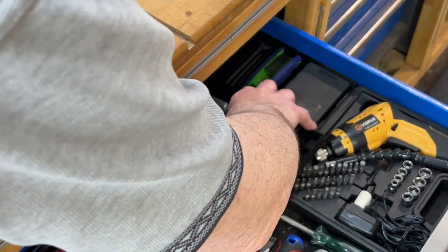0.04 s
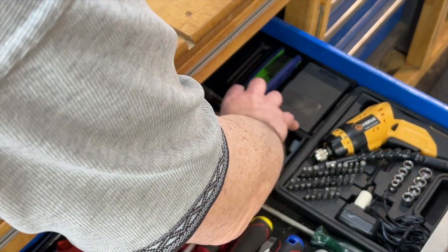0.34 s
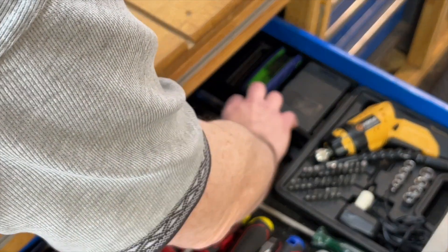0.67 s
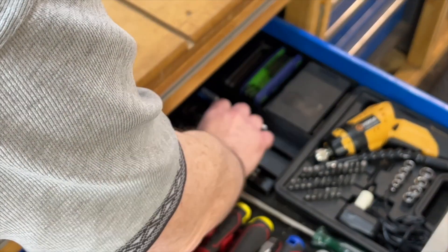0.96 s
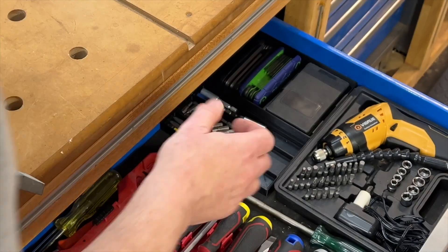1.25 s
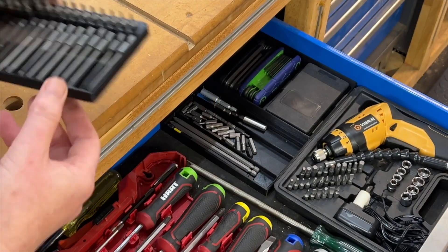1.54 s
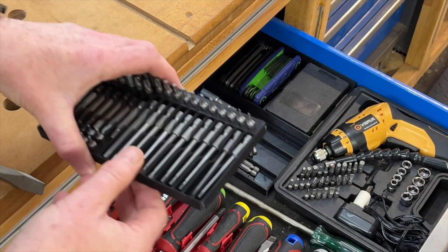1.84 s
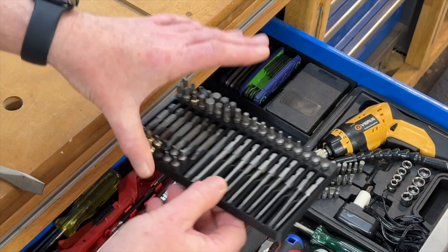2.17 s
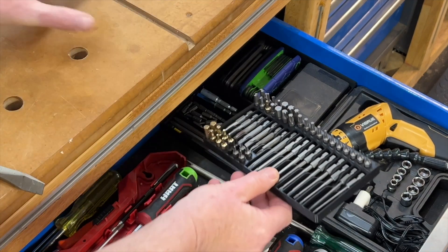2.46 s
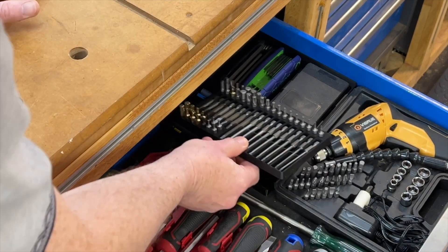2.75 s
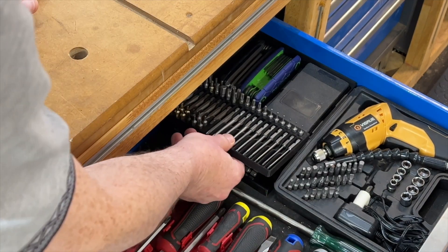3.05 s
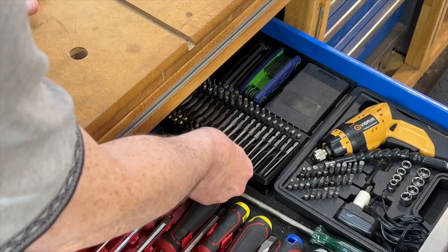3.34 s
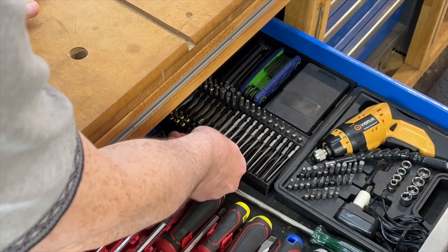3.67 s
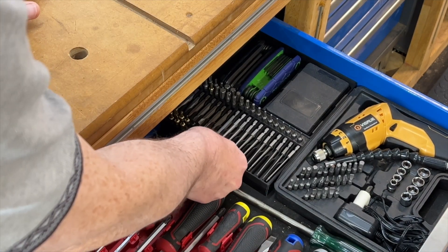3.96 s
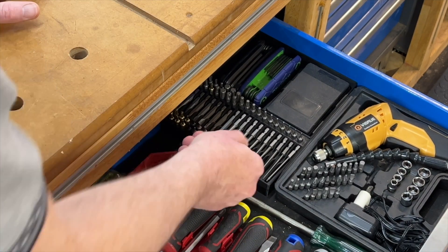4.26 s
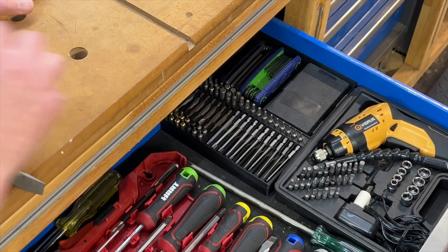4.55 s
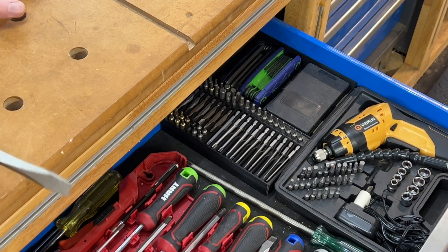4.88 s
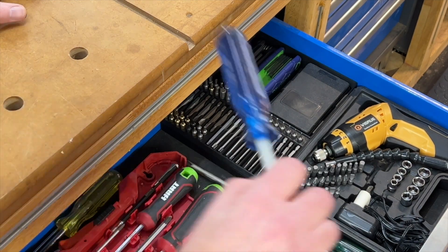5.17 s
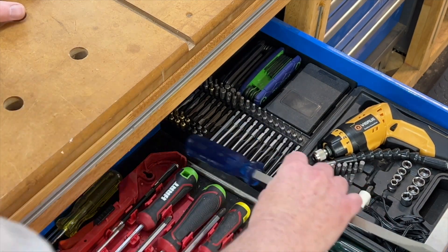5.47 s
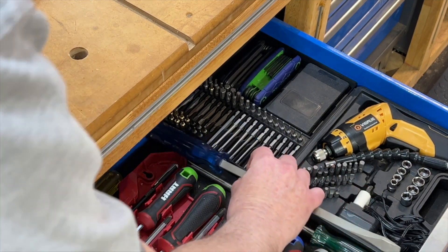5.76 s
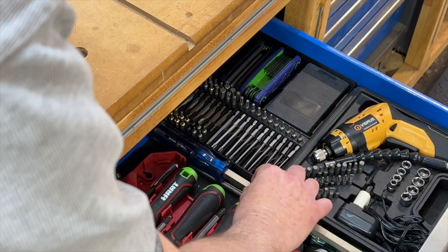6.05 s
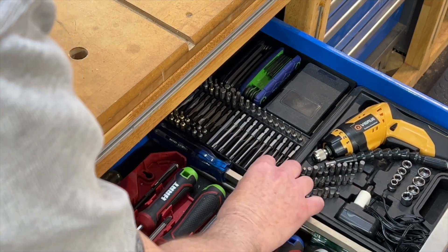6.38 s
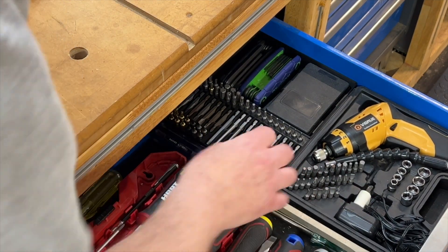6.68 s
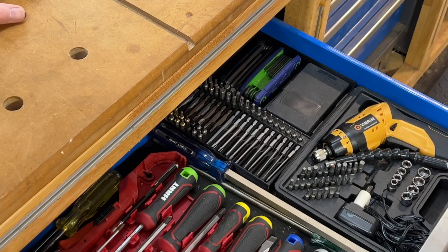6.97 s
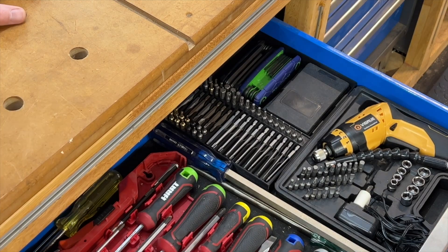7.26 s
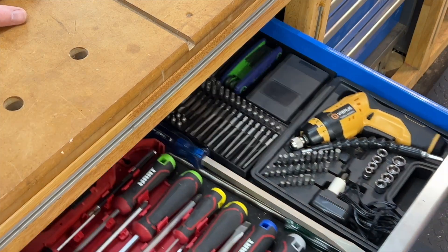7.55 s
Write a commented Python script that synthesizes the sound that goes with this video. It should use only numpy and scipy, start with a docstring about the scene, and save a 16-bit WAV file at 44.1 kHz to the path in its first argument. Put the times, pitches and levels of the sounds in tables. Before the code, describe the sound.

Close plastic clacks and small steel pings in a tool drawer, followed by dull screwdriver thuds and a hollow clunk.

```python
"""A small workshop, one microphone close to the open steel drawer of a workbench. A plastic case of
steel bits is lifted out, rattled and pressed back in: its walls crack and ring, the bits ping, fingers
scrape. A big screwdriver is laid beside it and nudged into place, and the drawer starts to roll.
Every knock is a short chatter of contacts that rings the plastic and thumps the drawer floor.
The room answers over a faint rumble and hiss; twice the whole sound drops away briefly."""
import sys
import numpy as np
from scipy import signal
from scipy.fft import rfft, irfft
from scipy.io import wavfile
from scipy.ndimage import uniform_filter1d

SR = 44100
rng = np.random.default_rng(int(sys.argv[2]) if len(sys.argv) > 2 else 0)


def file_out(sig):
    """Save sig as 16-bit WAV at sys.argv[1]."""
    # one column per channel
    cols = np.atleast_2d(sig).T
    # limit, then scale
    lim = np.clip(cols, -1, 1)
    pcm = np.round(lim * 32767).astype(np.int16)
    wavfile.write(sys.argv[1], SR, pcm)


N = 336042
GRAZE_S = .008  # surfaces brush this long before they meet


def undb(db):
    """Decibels to amplitude."""
    return 10 ** (np.asarray(db) / 20)


def unit(x):
    """Scale to rms 1."""
    return x / np.sqrt(np.mean(x ** 2))


def read(points, hz, column=1):
    """Interpolate a column of a table on a log-frequency axis."""
    table = np.array(points, float)
    return np.interp(np.log(np.maximum(hz, 1)), np.log(table[:, 0]), table[:, column])


def fade(t, t60):
    """Exponential decay, 60 dB in t60 seconds."""
    return np.exp(-np.log(1000) * t / max(t60, 1e-3))


def add(track, start_s, sound):
    """Mix a sound into the track."""
    start = int(start_s * SR)
    sound, start = sound[max(-start, 0):], max(start, 0)
    track[start:start + len(sound)] += sound[:N - start]


def even(burst, bins=81):
    """Give a burst unit energy, spread evenly over frequency; its fine grain stays."""
    spectrum = rfft(burst)
    return irfft(spectrum / np.sqrt(uniform_filter1d(abs(spectrum) ** 2, bins)), len(burst))


def response(colour, treble_db=0, bass_db=0, wall_hz=1500, wall_db=0, wall_octaves=.2, size=2048):
    """A body's impulse response with one wall resonance; hard contacts lift treble, heavy ones bass."""
    hz = np.maximum(np.arange(size // 2 + 1) * SR / size, 1)
    high, low = 1 / (1 + (2700 / hz) ** 4), 1 / (1 + (hz / 750) ** 4)
    wall = wall_db * (np.exp(-(np.log2(hz / wall_hz) / wall_octaves) ** 2) - .5 * (1 - high))
    # each contact touches other small parts, so its treble has peaks of its own
    ripple_db = 2.5 * unit(np.convolve(rng.standard_normal(len(hz)), np.hanning(41), "same"))
    magnitude = unit(undb(read(colour, hz))) * undb((treble_db + ripple_db) * high + bass_db * low + wall)
    cepstrum = irfft(np.log(magnitude))
    cepstrum[1:size // 2] *= 2  # folding makes the response causal
    cepstrum[size // 2 + 1:] = 0
    return irfft(np.exp(rfft(cepstrum)))


def ring(modes, scatter_db=3.0, detune=.008):
    """Decaying modes, starting near rms 1; each point of impact weights them a little differently."""
    t = np.arange(SR * 2 // 5) / SR
    hz, db, t60 = np.transpose(modes)
    gain_draw, pitch_draw = rng.standard_normal((len(modes), 2)).T
    gains = undb(db + scatter_db * gain_draw) * (-1) ** np.arange(len(modes))
    phase = 2 * np.pi * np.outer(hz * (1 + detune * pitch_draw), t)
    decay = np.array([fade(t, max(seconds, .04)) for seconds in t60])
    return gains @ (np.sin(phase) * decay) / np.sqrt(np.sum(gains ** 2) / 2)


def chatter(length_s, crack_t60, snap_t60=.013, contacts_per_s=1300, spread_db=3.5):
    """Surfaces graze, meet and chatter; each contact is a crack whose treble dies first."""
    t = np.arange(SR // 8) / SR - GRAZE_S
    touching = (rng.random(len(t)) < contacts_per_s / SR) * (t > 0)
    strength = undb(spread_db * rng.standard_normal(len(t)))
    flurry = 1 / (1 + (t / length_s) ** 6)
    contacts = touching * strength * flurry
    contacts[int(GRAZE_S * SR)] = .98  # the first firm contact
    graze = .15 * np.exp(-abs(t) / .0012) * (t < 0)
    grain = rng.standard_normal(len(t))
    out = 0
    for side, t60 in (("low", crack_t60), ("high", snap_t60)):
        power = graze + signal.lfilter([1], [1, -fade(2 / SR, t60)], contacts ** 2)
        burst = even(grain * np.sqrt(power))
        out += signal.sosfilt(signal.butter(3, 2600, side, fs=SR, output="sos"), burst)
    return out * np.sqrt((length_s + .0036) * SR)


def knock(body, modes, chatter_s, crack_t60, modes_db):
    """A chatter of contacts, coloured by the struck body and ringing its modes."""
    crack = signal.fftconvolve(chatter(chatter_s, crack_t60), body)
    rung = signal.fftconvolve(crack, ring(modes))
    sound = rung * undb(modes_db) * np.sqrt(np.sum(crack ** 2) / np.sum(rung ** 2))
    sound[:len(crack)] += crack
    return sound


def rebounds(start_s, db, treble_db, gap_s, step_db, treble_step_db=0):
    """A blow and two ever weaker rebounds, as rows of start_s, level_db, treble_db."""
    return [(start_s + k * gap_s, db + k * step_db, treble_db + k * treble_step_db) for k in range(3)]


# resonances of the drawer floor: pitch_hz, relative_db, t60_s
DRAWER_MODES = [(35, -18.5, 0.21), (62, -15, .12), (92, -6.5, 0.25), (124, 1, 0.18), (171, -8, 0.18),
                (212.8, -10.5, 0.24), (266.5, -12.5, 0.3), (350, -11.5, 0.057)]
# resonances of the plastic bit case: pitch_hz, relative_db, t60_s
CASE_MODES = [(970, -2, 0.18), (1035, -1.5, .1), (1105, -2, .13), (1439, 1, 0.2), (1390, -3.5, .14),
              (1646, -3, .16), (1673, -2.5, 0.14), (1856, -4, .12), (1950, -2, .11), (2210, -1.5, .12)]
# spectrum of a contact on the case: frequency_hz, relative_db
CASE_COLOUR = [(60, -16.5), (150, -13), (250, -8.5), (400, -7.5), (580, -8), (900, -1), (1200, -0.5),
               (1850, -1), (2300, -6), (2800, -15.5), (4000, -14.5), (5800, -15.5), (8000, -22),
               (15500, -35.5)]


def case_blow(weight_db, treble_db, chatter_s, wall_hz, wall_db):
    """One blow of the case: the plastic cracks, one wall rings out and the drawer floor thumps."""
    body = response(CASE_COLOUR, treble_db, bass_db=.5 * weight_db + 13, wall_hz=wall_hz, wall_db=wall_db)
    sound = knock(body, CASE_MODES, chatter_s, crack_t60=.04, modes_db=-21)
    add(sound, GRAZE_S, undb(weight_db) * ring(DRAWER_MODES))
    return sound


# the edge of the case against a tray: start_s, level_db, treble_db
EDGE_CLACKS = [(0, -23, 1.5), (0.287, -21, -14), (0.313, -20, -4), (0.591, -14.5, -11.5),
               (0.605, -17.5, -9), (2.931, -26, -8.5), (2.938, -16.5, -10.5), (3.072, -20.5, -12.5),
               (3.086, -23.5, -14), (3.438, -20.5, 2.5), (3.452, -17, -13)]
# its base on the drawer floor: start_s, level_db, weight_db, treble_db, chatter_s
BASE_LANDINGS = [(0.332, -32.5, -15, 6.5, 0.016), (0.358, -30, -1.5, 1, .007), (0.634, -10, -12, 5, .014),
                 (0.978, -31, -5.5, 2.5, 0.015), (1.074, -38, -0.5, -15, .008),
                 (3.008, -25.5, -4.5, -13, 0.022), (3.304, -34.5, -8, -14.5, .011),
                 (3.389, -39.5, -12.5, -15.5, .008), (3.469, -9, -21, -2, .019),
                 (3.709, -20.5, -20.5, -8, .01), (3.728, -20, -19.5, -5.5, .014)]
# bits shifting in their sockets: start_s, level_db
SOCKET_TICKS = [(0.45, -46), (1.552, -56), (1.659, -42.5), (1.673, -43), (1.762, -58.5), (1.871, -61),
                (1.978, -53.5), (2.095, -54.5), (2.176, -57)]


def bit_case():
    """The case clacks lightly on its edge, ringing its long wall, and lands on its base; bits tick."""
    out = np.zeros(N)
    for clack in EDGE_CLACKS:
        for s, db, treble_db in rebounds(*clack, gap_s=.02, step_db=-14.5, treble_step_db=-3):
            blow = case_blow(weight_db=-27, treble_db=treble_db, chatter_s=.008, wall_hz=1120, wall_db=6.5)
            add(out, s - GRAZE_S, undb(db) * blow)
    for start_s, first_db, weight_db, first_treble_db, chatter_s in BASE_LANDINGS:
        hits = rebounds(start_s, first_db, first_treble_db, gap_s=.036, step_db=-15, treble_step_db=-2.5)
        for s, db, treble_db in hits:
            blow = case_blow(weight_db, treble_db, chatter_s, wall_hz=1700, wall_db=3)
            add(out, s - GRAZE_S, undb(db) * blow)
    for s, db in SOCKET_TICKS:
        tick = case_blow(weight_db=-24.5, treble_db=-9.5, chatter_s=.0028, wall_hz=2060, wall_db=6.5)
        add(out, s - GRAZE_S, undb(db) * tick)
    return out


# single steel bits ringing: start_s, pitch_hz, level_db, t60_s
BIT_PINGS = [(0.0, 11880, -42.5, 0.27), (0.0, 8750, -46.5, 0.3), (0.0, 3980, -47, 0.32),
             (0.0, 1170, -29, 0.24), (.636, 12050, -32, 0.38), (.636, 5523, -26, .1),
             (.636, 8845, -45, .28), (.982, 7677, -44, 0.25), (.982, 12060, -51, 0.26),
             (3.047, 8800, -42, .18)]


def steel_bits(flutter_hz=110):
    """A loose bit rings while it buzzes in its socket, so its tone flutters."""
    out = np.zeros(N)
    t = np.arange(SR * 2 // 5) / SR
    for s, hz, db, t60 in BIT_PINGS:
        shake = rng.standard_normal(len(t)) + 1j * rng.standard_normal(len(t))
        buzz = signal.sosfilt(signal.butter(2, flutter_hz, fs=SR, output="sos"), shake)
        tone = unit(np.real(buzz * np.exp(2j * np.pi * hz * t)))
        add(out, s, undb(db) * tone * fade(t, t60))
    return out


def scrape(body, slips_per_s=1600, spread_db=3.5):
    """Dense little slips sound through a body; rms 1."""
    slipping = rng.random(N) < slips_per_s / SR
    slips = slipping * undb(spread_db * rng.standard_normal(N)) * rng.choice([-1, 1], N)
    return unit(signal.oaconvolve(slips, body)[:N])


# fingers sliding over the case: start_s, length_s, level_db
FINGER_STROKES = [(1.56, .15, -66), (1.99, .11, -64.5), (2.165, .03, -63.5), (2.99, .43, -41),
                  (6.38, .25, -71.5)]


def fingers(attack_s=.017, sag_db_per_s=36, release_t60=.11):
    """Each stroke grips, eases off steadily and lets go, scraping through the plastic."""
    pressure = np.zeros(N)
    t = np.arange(SR) / SR
    for s, length_s, db in FINGER_STROKES:
        grip = np.minimum(t / attack_s, 1)
        release = fade(np.maximum(t - length_s, 0), release_t60)
        add(pressure, s, undb(db - sag_db_per_s * t) * grip * release)
    return pressure * scrape(response(CASE_COLOUR, treble_db=-11, bass_db=-6.5, wall_hz=1797, wall_db=2.5))


# hollow clunks in the drawer: start_s, level_db
CLUNKS = [(4.741, -65), (7.363, -23.5)]
# their resonances: pitch_hz, relative_db, t60_s
CLUNK_MODES = [(366.6, -0.5, 0.23), (420, -3, 0.08), (507.5, 5.5, 0.2), (606, 5.5, 0.039),
               (766, -13.5, 0.24)]


def clunks():
    """A few low modes ring briefly: barely heard the first time, plainly the second."""
    out = np.zeros(N)
    for s, db in CLUNKS:
        add(out, s, undb(db) * ring(CLUNK_MODES, detune=.0043))
    return out


# the screwdriver settling among its neighbours: start_s, level_db, weight_db, treble_db, chatter_s
HANDLE_KNOCKS = [(5.584, -25.5, 2, -3.5, 0.0087), (5.653, -20.5, -21.5, -2.5, 0.013),
                 (5.764, -27.5, 1.5, -8, 0.0041), (5.791, -20.5, 5.5, 2, 0.011),
                 (5.831, -27.5, 3, -1.5, 0.027), (6.027, -42, -1.5, -10.5, 0.0048),
                 (6.064, -18, -11, -6.5, 0.01), (6.279, -39, -18, -3, 0.0059),
                 (7.357, -36.5, -1, 0.5, .013)]
# spectrum of a contact of its handle: frequency_hz, relative_db
HANDLE_COLOUR = [(60, -4), (170, -4), (270, -5.5), (450, 1.5), (700, 3.5), (1000, 2), (1600, -3),
                 (2200, -8), (2800, -18), (4000, -19), (6500, -25), (10000, -30), (15500, -43.5)]
# resonances the handle rings: pitch_hz, relative_db, t60_s
HANDLE_MODES = [(552.8, -9.5, 0.61), (694, -11.5, 0.24), (1164, 0.5, 0.17), (1325, 1.5, 0.18),
                (1660, -15.5, .15), (2330, -16, .18)]
# resonances of a hollow drill case alongside: pitch_hz, relative_db, t60_s
DRILL_CASE_MODES = [(178.5, -9.5, 0.25), (382.5, -0.5, .06), (433.5, -1, 0.14), (466.6, -6.5, 0.14),
                    (706, -27.5, 0.49), (1655, -13, 0.17), (3180, -30, 0.27)]


def screwdriver(drill_case_db=-8):
    """The heavy handle lands with dull blows that boom in the drawer floor and the drill case."""
    out = np.zeros(N)
    for start_s, first_db, weight_db, first_treble_db, chatter_s in HANDLE_KNOCKS:
        for s, db, treble_db in rebounds(start_s, first_db, first_treble_db, gap_s=.021, step_db=-12.5):
            body = response(HANDLE_COLOUR, treble_db)
            blow = knock(body, HANDLE_MODES, chatter_s, crack_t60=.024, modes_db=-11)
            add(out, s - GRAZE_S, undb(db) * blow)
        boom = ring(DRAWER_MODES) + undb(drill_case_db) * ring(DRILL_CASE_MODES, detune=.0017)
        add(out, start_s, undb(first_db + weight_db) * boom)
    # once the screwdriver meets the drill case itself
    add(out, start_s=6.064, sound=undb(-13.5) * ring(DRILL_CASE_MODES, detune=.0026))
    return out


def runners(start_s=7.36, rise_s=.026):
    """The nudged drawer rolls; its runners grumble evenly through the trays and the drawer floor."""
    speed = np.clip((np.arange(N) / SR - start_s) / rise_s, 0, 1)
    trays = undb(-58) * scrape(response(HANDLE_COLOUR, treble_db=4.5))
    floor = undb(-53) * scrape(ring(DRAWER_MODES))
    return speed * (trays + floor)


# decay of the room around the bench: frequency_hz, t60_s
ROOM_DECAY = [(60, 0.35), (200, .58), (600, 0.73), (1500, 0.44), (4000, 0.58), (8000, 0.4), (15000, .35)]
# a deep rumble that swells with the knocks and fades slowly: frequency_hz, relative_db, t60_s
DEEP_RUMBLE = [(25.2, 1.5, 4.2), (71, -14.5, 1.6), (149, -22.5, 1.9), (450, -31, 1.6), (1000, -25.5, 1.2),
               (2500, -38, 0.61), (7975, -44.5, .6)]


def echoes_and_rumble(room_db=-7, build_s=.0052):
    """Diffuse echoes build up quickly and die by octave bands; a deep rumble swells and fades slowly."""
    t = np.arange(2 * SR) / SR
    octave = np.log2(np.maximum(np.fft.rfftfreq(len(t), 1 / SR), 1))
    white = rfft(rng.standard_normal(len(t)))
    build = 1 - np.exp(-t / build_s)
    out = np.zeros(len(t))
    for hz in 2. ** np.arange(5, 15):
        band = np.clip(1 - abs(octave - np.log2(hz)), 0, 1)
        room = undb(room_db) * unit(build * fade(t, read(ROOM_DECAY, hz)))
        rumble = undb(read(DEEP_RUMBLE, hz)) * unit(build * fade(t, read(DEEP_RUMBLE, hz, column=2)))
        out += irfft(white * band) * np.hypot(room, rumble)
    return out / np.sqrt(len(t))


def workshop(direct, patterns=4, crossfade_s=.016):
    """Four echo patterns crossfade rapidly, so the room sounds diffuse and does not ring."""
    cycle = np.arange(N) / SR / crossfade_s % patterns
    out = np.zeros(N)
    for k in range(patterns):
        share = np.clip(1 - abs((cycle - k + 1) % patterns - 1), 0, 1)
        out += signal.oaconvolve(direct * np.sqrt(share), echoes_and_rumble())[:N]
    return out


# spectrum of the background at the bench: frequency_hz, relative_db
ROOM_TONE = [(25, -65.5), (60, -77.5), (150, -87.5), (400, -93), (1500, -100), (5000, -100), (13000, -99),
             (15500, -110)]


def room_tone(level_db=-67):
    """A faint, steady rumble and hiss."""
    colour = undb(read(ROOM_TONE, np.fft.rfftfreq(N, 1 / SR)))
    return undb(level_db) * unit(irfft(rfft(rng.standard_normal(N)) * colour, N))


# two near-silent moments: start_s, end_s
LULLS = [(2.719, 2.91), (5.05, 5.56)]


def lulls(depth_db=-45):
    """A gain that sinks smoothly during each lull."""
    t = np.arange(N) / SR
    inside = sum((t > start_s) & (t < end_s) for start_s, end_s in LULLS)
    return undb(depth_db * uniform_filter1d(1. * inside, SR // 30))


def scene():
    """The drawer up close and the room behind it, in mono."""
    direct = bit_case() + steel_bits() + screwdriver() + clunks() + fingers() + runners()
    return ((direct + workshop(direct) + room_tone()) * lulls())[None]


def record(dry):
    """The microphone rounds the loudest peaks; the top is cut above 15.8 kHz."""
    return signal.sosfilt(signal.ellip(8, .2, 70, 15800, fs=SR, output="sos"), np.tanh(dry))


dry = scene()
out = record(dry)
file_out(out)
```